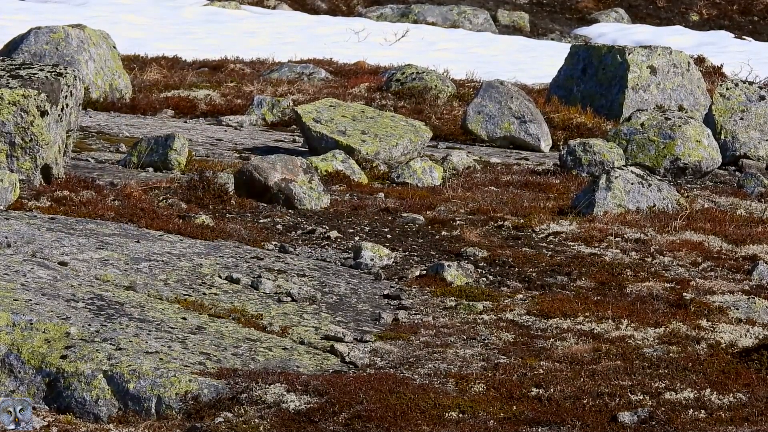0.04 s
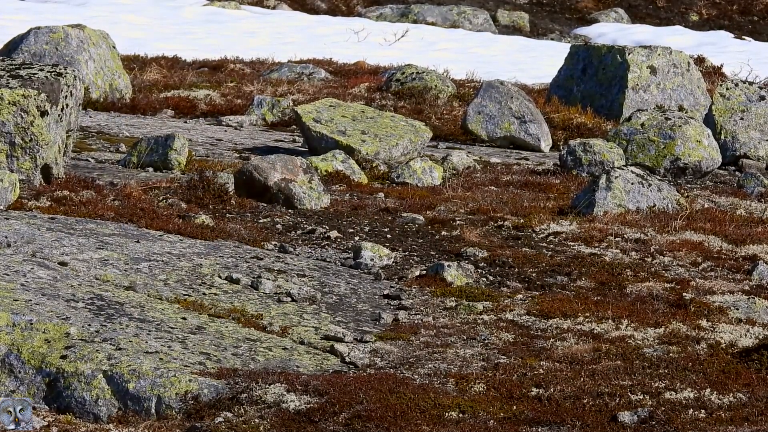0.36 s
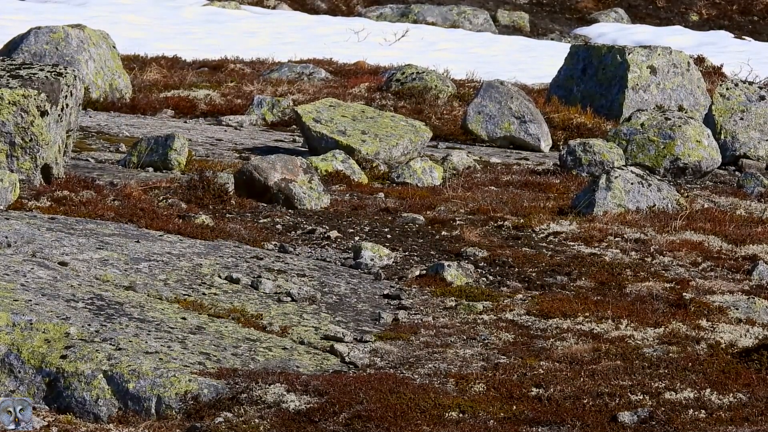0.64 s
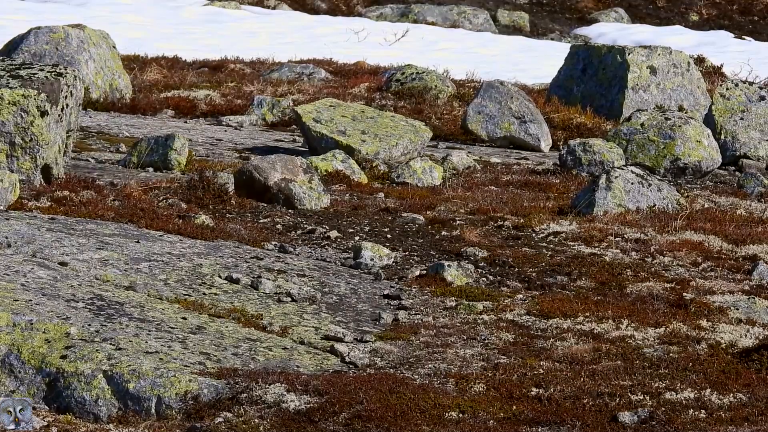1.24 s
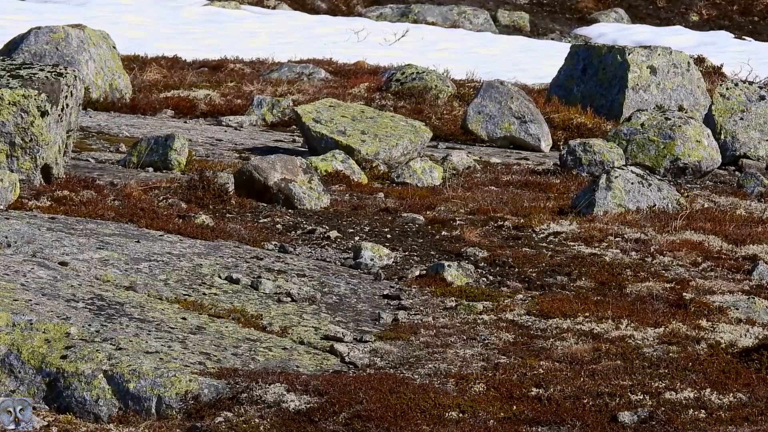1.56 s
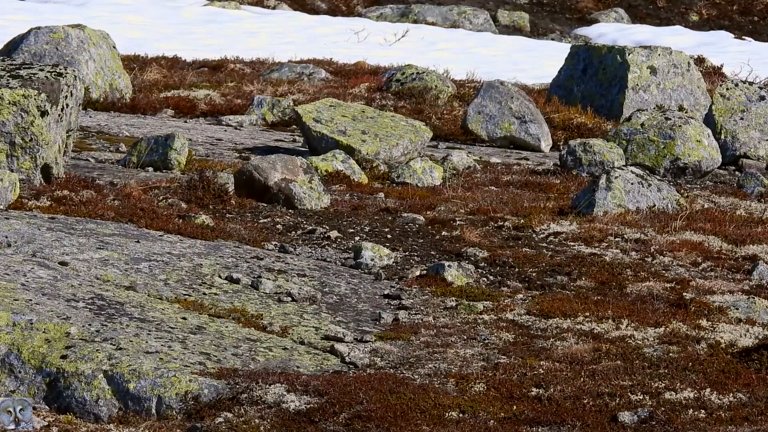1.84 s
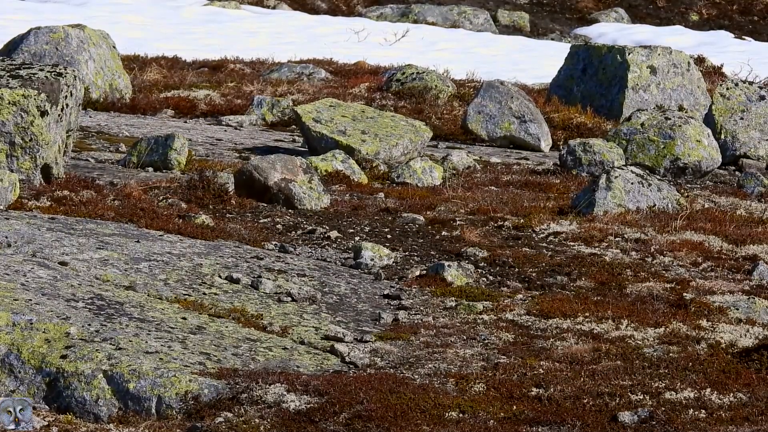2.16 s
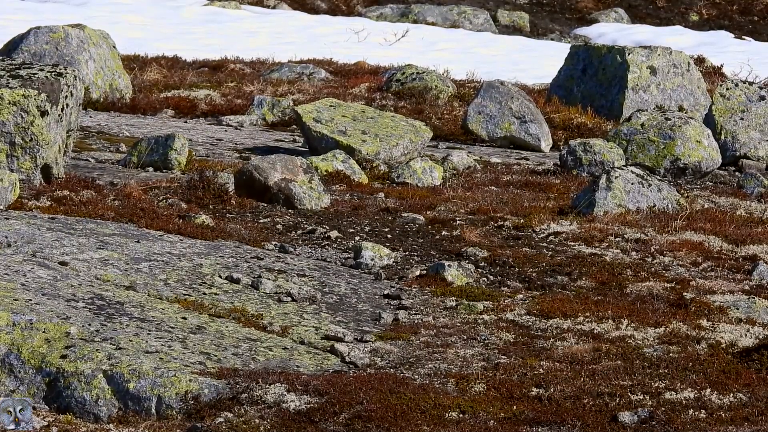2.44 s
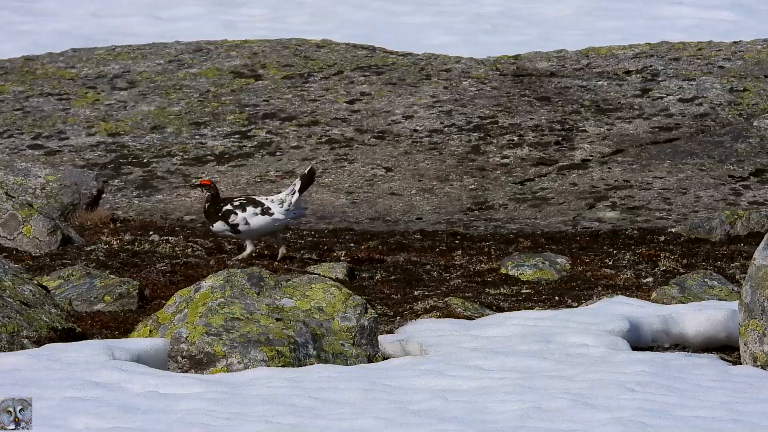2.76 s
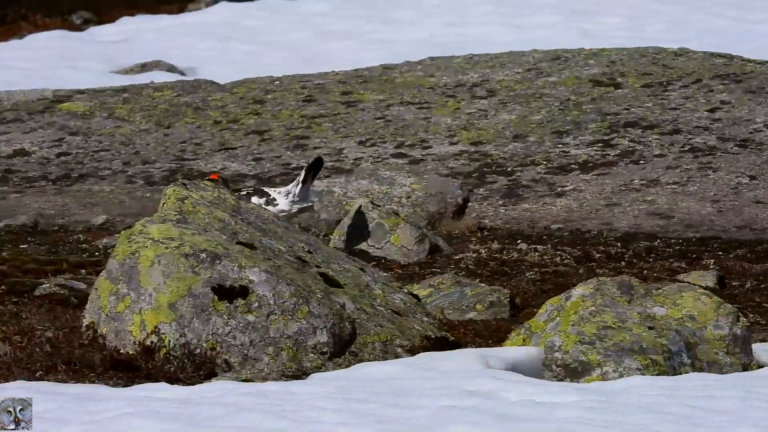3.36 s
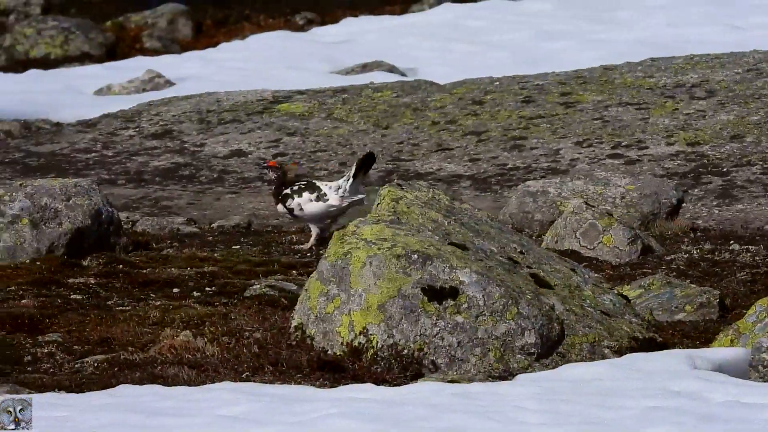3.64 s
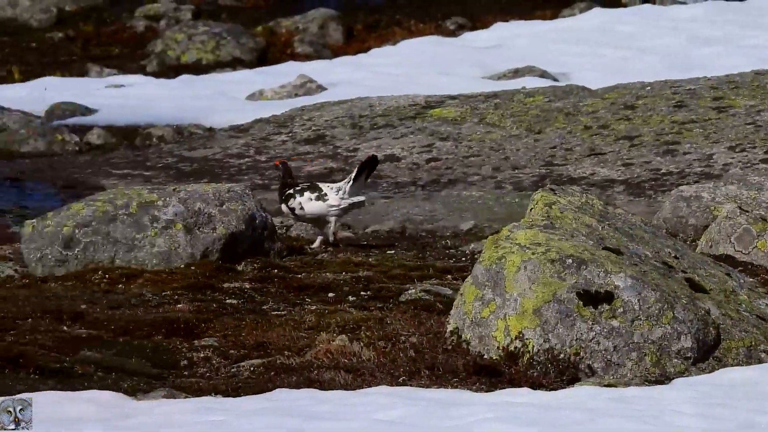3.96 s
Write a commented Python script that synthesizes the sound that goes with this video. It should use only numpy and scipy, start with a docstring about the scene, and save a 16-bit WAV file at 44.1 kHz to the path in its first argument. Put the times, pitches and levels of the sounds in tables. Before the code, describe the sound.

Close by on rocky open ground, a ptarmigan calls once in a fast, dry rattle. A small scuff follows, then faint distant trickling water and even hiss, until slight wind on the microphone and three soft ticks from the bird.

```python
"""A ptarmigan gives one dry rattle on open rocky tundra: fifteen snaps of the voice, each ringing its throat,
over a thin rasp of air and with a short scatter off the rocks. A grainy scuff follows. Meltwater trickles some
way off as a wash of bubbles and splashes, with a few nearer gurgles. Towards the end a darker, hollow-ringing
wash comes in, a breeze rumbles on the microphone and the bird ticks softly three times. An even microphone hiss
lies under it all."""
import sys
import numpy as np
from scipy import signal
from scipy.fft import rfft, irfft
from scipy.io import wavfile
from scipy.ndimage import uniform_filter1d

SR = 44100
rng = np.random.default_rng(int(sys.argv[2]) if len(sys.argv) > 2 else 0)


def file_out(sig):
    """Save sig as 16-bit WAV at sys.argv[1]."""
    # one column per channel
    cols = np.atleast_2d(sig).T
    # limit, then scale
    lim = np.clip(cols, -1, 1)
    pcm = np.round(lim * 32767).astype(np.int16)
    wavfile.write(sys.argv[1], SR, pcm)


N = 176400

# tone of the microphone hiss: frequency_hz, gain_db
HISS_EQ = [(30, -3), (90, 1), (220, 4.5), (400, -2), (1000, -2.5), (3000, 1), (6000, 2), (15500, 1.5)]
# tone of the wind on the microphone: frequency_hz, gain_db
WIND_EQ = [(20, -17), (45, -7), (80, 2), (115, 2.5), (180, -2.5), (300, -9.5), (600, -18), (2000, -55)]
# swell of the wind: time_s, level_db
WIND_FADER = [(0, -56), (.24, -66), (.34, -53), (.55, -58), (1.05, -53.5), (1.6, -57.5), (2.2, -62),
              (2.78, -56.5), (3.08, -49), (3.2, -51), (3.33, -48.5), (3.8, -49), (4, -49.5)]
# tone of the water's wash: frequency_hz, gain_db
WASH_EQ = [(100, -24.5), (300, -4.5), (480, -2), (680, -2), (1000, 0), (1500, -2.5), (2200, -8.5),
           (4000, -13), (9000, -25)]
# tone of the fine splashes: frequency_hz, gain_db
SPLASH_EQ = [(400, -30), (1200, 2), (3500, -1), (7000, -15), (15000, -34)]
# slow ebb of the trickle: time_s, level_db
WATER_FADER = [(0, -46), (.52, -46), (.68, -48), (1.9, -47), (2.1, -48.5), (2.7, -48.5), (3.2, -51),
               (4, -55)]
# tone of the darker, hollow wash: frequency_hz, gain_db
HOLLOW_EQ = [(300, -22), (520, -9), (630, 2.5), (760, -8), (900, 0.5), (1100, -10), (1600, -13.5),
             (4000, -38)]
# fade-in of that hollow tone: time_s, level_db
HOLLOW_FADER = [(2.55, -84), (2.8, -56), (4, -52.5)]
# nearer gurgles and drips: start_s, pitch_hz, level_db, length_s, rise_octaves
GURGLES = [(.635, 714, -47, .03, 0.16), (0.835, 707, -45.5, 0.026, 0), (1.026, 1180, -44, 0.013, 0.24),
           (1.307, 1476, -42, 0.017, .1), (1.504, 720, -45, 0.019, .3), (1.868, 853, -44.5, 0.037, 0.17),
           (1.906, 698, -53.5, .035, 0.51), (1.968, 1210, -46, .025, .7), (2.415, 616, -45, 0.051, 0.67),
           (2.763, 1410, -41, 0.023, 0.1)]
# strokes of the scuff: start_s, hold_s, level_db
SCUFF_STROKES = [(0.5617, 0.0041, -35.5), (0.5678, 0.0028, -36), (0.5789, 0.0032, -30.5)]
# tone of the scuff: frequency_hz, gain_db
SCUFF_EQ = [(100, -14), (270, -11), (500, -9), (1200, -5.5), (2000, -1), (3000, -1.5), (4000, -8),
            (6000, -13.5), (8200, -9), (11500, -8.5), (15500, -21)]
# the bird's soft ticks: start_s, level_db
TICKS = [(3.7074, -30.5), (3.7470, -28), (3.7817, -25.5)]
# resonances of a tick: pitch_hz, gain_db, decay_s
TICK_MODES = [(1096, -3, 0.0022), (2320, -1, 0.00058), (3940, -6, 0.00061)]
# glide of the throat's resonances through the call: time_s, low_hz, main_hz, upper_hz
THROAT_GLIDE = [(.06, 950, 2430, 3220), (.14, 1003, 2486, 3440), (.27, 1017, 2460, 3480),
                (.355, 1004, 2400, 3470), (.41, 1020, 2350, 3260), (.442, 1130, 2250, 3240)]
# ring of the low, main and upper resonance: gain_db, decay_s, starts_flat_fraction
THROAT_RINGS = [(-10.5, .0032, 0.007), (3.5, 0.002, .005), (-5.5, 0.0018, .19)]
# faint overtones of each snap: pitch_hz, gain_db, decay_s, starts_flat_fraction
SNAP_OVERTONES = [(4620, -22, 0.0015, 0.029), (7500, -27.5, 0.0027, 0.19), (8600, -26, 0.00089, 0.076)]
# snaps of the rattle: start_s, level_db, upper_resonance_gain_db
RATTLE_SNAPS = [(0.0617, -11.5, -2), (0.0873, -12.4, -7), (0.1135, -11.5, -6), (0.1399, -10.5, -1),
                (.1640, -10.5, -1), (.1900, -11.5, 1), (0.2164, -10, 3.5), (0.2441, -10.5, 2),
                (0.2708, -12, 2), (0.2974, -12, 3), (.3260, -12, 2), (.3550, -10.5, 4.5),
                (0.3818, -10, 2.5), (0.4124, -11, 4), (0.4405, -12.5, 3)]

WATER_CORRELATION, WATER_PATCH_DB = 0.74, 1.65


def amp(db):
    """Decibels to gain."""
    return 10 ** (np.asarray(db) / 20)


def unit_rms(x):
    """Scales to rms 1."""
    return x / np.sqrt(np.mean(x ** 2) + 1e-20)


def fader(points):
    """Gain over time from a curve in dB."""
    return amp(np.interp(np.arange(N) / SR, *np.transpose(points)))


def add(mix, start_s, sound):
    """Lays a sound into one channel."""
    part = mix[max(round(start_s * SR), 0):][:len(sound)]
    part += sound[:len(part)]


def equalise(x, eq):
    """Applies an EQ curve drawn on a log-frequency axis, keeping the power of white noise."""
    hz, db = np.transpose(eq)
    curve_db = np.interp(np.log(np.fft.rfftfreq(N, 1 / SR) + 1), np.log(hz + 1), db)
    return irfft(rfft(x) * unit_rms(amp(curve_db)), N)


def stereo(two, correlation):
    """Uses two unrelated signals as mid and side; more correlation narrows the image."""
    mid = np.sqrt((1 + correlation) / 2) * two[0]
    side = np.sqrt((1 - correlation) / 2) * two[1]
    return np.array([mid + side, mid - side])


def patchy_noise(eq, correlation, patch_db):
    """A stereo noise bed whose level wavers in patches across time and frequency."""
    white = stereo(rng.standard_normal((2, N)), correlation)
    _, _, spectra = signal.stft(white, SR, nperseg=1024, noverlap=768)
    patches = uniform_filter1d(rng.standard_normal(spectra.shape[1:]), size=7, axis=0)
    patches = unit_rms(uniform_filter1d(patches, size=8, axis=1))
    _, bed = signal.istft(spectra * amp(patch_db * patches), nperseg=1024, noverlap=768)
    return unit_rms(equalise(bed[:, :N], eq))


def blip(hz, db, length_s, rise_octaves=0):
    """A short rounded tone that may rise in pitch."""
    progress = np.arange(0, length_s, 1 / SR) / length_s
    cycles = np.cumsum(hz * 2 ** (rise_octaves * progress)) / SR
    return amp(db) * np.sin(np.pi * progress) ** 2 * np.sin(2 * np.pi * cycles)


def ring(hz, db, decay_s, flat=0):
    """A snapped resonance: it may start flat, then settles on its pitch as it dies away."""
    attack_s, settle_s = 0.00012, 0.002
    t = np.arange(SR // 25) / SR
    cycles = hz * (t - flat * settle_s * (1 - np.exp(-t / settle_s)))
    envelope = (1 - np.exp(-t / attack_s)) * np.exp(-t / decay_s)
    return amp(db) * envelope * np.sin(2 * np.pi * cycles)


def among_rocks(events, echo_db):
    """Places (start_s, sound) pairs, each with its own brief scatter off the ground and boulders."""
    predelay_s, t60_s = 0.003, 0.082
    t = np.arange(SR // 4) / SR
    tail = (t > predelay_s) * np.exp(-np.log(1000) * t / t60_s)
    out = np.zeros((2, N))
    for start_s, sound in events:
        scatter = stereo(rng.standard_normal((2, len(t))), correlation=0.16) * tail
        echoes = signal.fftconvolve(sound[None], scatter / np.linalg.norm(scatter[0]), axes=1)
        for channel, echo in zip(out, echoes):
            add(channel, start_s, sound)
            add(channel, start_s, amp(echo_db) * echo)
    return out


def wind():
    """A breeze on the microphone: a lumpy rumble that comes up late, with one stronger buffet."""
    rumble = fader(WIND_FADER) * patchy_noise(WIND_EQ, correlation=0.95, patch_db=1)
    buffet = blip(hz=115, db=-40, length_s=0.036)
    for channel in rumble:
        add(channel, start_s=3.502, sound=buffet)
    return rumble


def hollow_tone():
    """A darker wash with a hollow ring fades in towards the end."""
    return fader(HOLLOW_FADER) * patchy_noise(HOLLOW_EQ, WATER_CORRELATION, WATER_PATCH_DB)


def bubbles():
    """Small bubbles ring at random moments, each chirping upward as it fades."""
    bubbles_per_s, decay_cycles, rise_per_decay, tilt_db_per_octave = 150, 12.3, 0.0677, -2
    pitches_hz = np.geomspace(606, 2453, num=30)
    t = np.arange(SR // 12) / SR
    out = np.zeros((2, N))
    for hz in pitches_hz:
        age = t * hz / decay_cycles
        cycles = hz * t * (1 + rise_per_decay * np.minimum(age, 10) / 2)
        bubble = (1 - np.exp(-t * hz)) * np.exp(-age) * np.sin(2 * np.pi * cycles)
        births = rng.random(N) < bubbles_per_s / len(pitches_hz) / SR
        spread_db = -0.5 * np.minimum(rng.exponential(1, N), 3)
        tilt_db = tilt_db_per_octave * np.log2(hz / pitches_hz[0])
        stream = signal.oaconvolve(births * amp(spread_db + tilt_db), bubble)[:N]
        pan_left = rng.uniform(-0.34, 0.53)
        out += np.outer([1 + pan_left, 1 - pan_left], stream)
    return unit_rms(out)


def splashes():
    """Fine splashing: a patter of tiny, bright noise bursts."""
    splashes_per_s, decay_s = 70, 0.0066
    t = np.arange(SR // 12) / SR
    hits = (rng.random(N) < splashes_per_s / SR) * rng.random(N)
    bursts = signal.oaconvolve(hits, np.exp(-t / decay_s))[:N]
    spray = stereo(rng.standard_normal((2, N)), WATER_CORRELATION)
    return unit_rms(equalise(bursts * spray, SPLASH_EQ))


def meltwater():
    """The distant trickle: bubbles and splashes tucked under a patchy wash."""
    sparkle = amp(-7) * bubbles() + amp(-7.5) * splashes()
    wash = patchy_noise(WASH_EQ, WATER_CORRELATION, WATER_PATCH_DB)
    return fader(WATER_FADER) * (wash + sparkle)


def gurgles():
    """A few nearer bubbles stand out of the trickle."""
    return among_rocks([(start_s, blip(*shape)) for start_s, *shape in GURGLES], echo_db=-11)


def scuff():
    """Three quick strokes of dry grains over a small thud."""
    release_s, grain_spread_db, grains_per_s = 0.005, 2.5, 25000
    t = np.arange(N) / SR
    strokes = sum(amp(db) * (t >= start_s) * np.exp(-np.maximum(t - start_s - hold_s, 0) / release_s)
                  for start_s, hold_s, db in SCUFF_STROKES)
    grains = rng.standard_normal((2, N)) * amp(grain_spread_db * rng.standard_normal(N))
    grains *= rng.random(N) < grains_per_s / SR
    out = equalise(stereo(unit_rms(grains), correlation=0.79) * strokes, SCUFF_EQ)
    thud = ring(hz=280, db=-28, decay_s=0.0051)
    for channel in out:
        add(channel, start_s=0.5685, sound=thud)
    return out


def ticks():
    """The bird's soft ticks, each a tight ring of three resonances."""
    tick = sum(ring(*mode) for mode in TICK_MODES)
    return among_rocks([(start_s, amp(db) * tick) for start_s, db in TICKS], echo_db=-9.5)


def rasp():
    """Air hisses through the throat's gliding resonances for as long as the rattle lasts."""
    start_s, end_s, fade_s, width_hz = 0.044, 0.455, 0.012, 1400
    t = np.arange(N) / SR
    times, *glides_hz = np.transpose(THROAT_GLIDE)
    air = stereo(rng.standard_normal((2, N)), correlation=0.21)
    pole = np.exp(-np.pi * width_hz / SR)
    breath = np.zeros((2, N))
    for glide_hz, (db, _, flat), polarity in zip(glides_hz, THROAT_RINGS, (1, -1, 1)):
        centre_hz = np.interp(t, times, glide_hz) * (1 - flat / 2)
        carrier = np.exp(2j * np.pi * np.cumsum(centre_hz) / SR)
        # a moving band-pass: shift down, low-pass, shift back up
        band = (carrier * signal.lfilter([1], np.poly([pole, pole]), air / carrier)).real
        breath += polarity * amp(db / 2) * band
    fizz = amp(-7.5) * rng.standard_normal((2, N))
    gate = np.clip(np.minimum(t - start_s, end_s - t) / fade_s, 0, 1)
    return amp(-36.5) * (unit_rms(breath) + fizz) * gate


def snap(start_s, db, upper_db):
    """One pulse of the voice cracks and rings the throat and chest."""
    pitch_spread, crack_decay_s = 0.007, 0.0012
    times, *glides_hz = np.transpose(THROAT_GLIDE)
    throat = [(np.interp(start_s, times, hz), *shape) for hz, shape in zip(glides_hz, THROAT_RINGS)]
    low, main, upper, *overtones = [ring(hz * (1 + pitch_spread * rng.standard_normal()), *shape)
                                    for hz, *shape in throat + list(SNAP_OVERTONES)]
    # neighbouring throat resonances start in opposite directions
    voice = low - main + amp(upper_db) * upper - sum(overtones)
    t = np.arange(len(voice)) / SR
    crack = amp(-25) * np.exp(-t / crack_decay_s) * rng.standard_normal(len(t))
    chest = ring(hz=313, db=-22.5, decay_s=0.0017)
    return amp(db) * (voice + crack + chest)


def rattle():
    """The ptarmigan's call, up front: a fast run of dry snaps."""
    snaps = [(start_s, snap(start_s, db, upper_db)) for start_s, db, upper_db in RATTLE_SNAPS]
    return among_rocks(snaps, echo_db=-10)


def scene():
    """The bird and the scuff over a bed of water and wind."""
    ptarmigan = rattle() + ticks() + rasp()
    return ptarmigan + scuff() + meltwater() + gurgles() + hollow_tone() + wind()


def record(dry):
    """Each microphone adds its own hiss; a steep high cut trims the very top."""
    hiss = amp(-42.5) * equalise(rng.standard_normal((2, N)), HISS_EQ)
    high_cut = signal.firwin(511, cutoff=15900, window=("kaiser", 9), fs=SR)
    return signal.oaconvolve(dry + hiss, high_cut[None], "same")


dry = scene()
out = record(dry)
file_out(out)
```